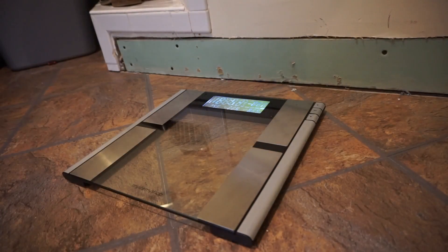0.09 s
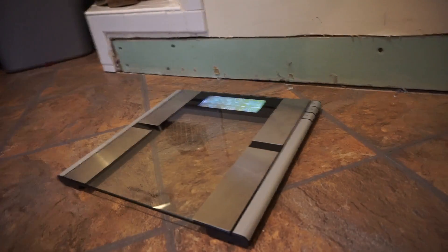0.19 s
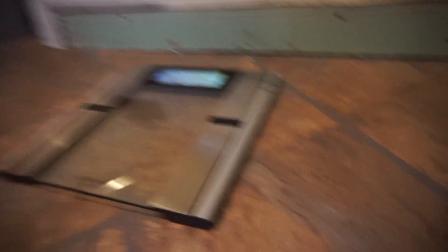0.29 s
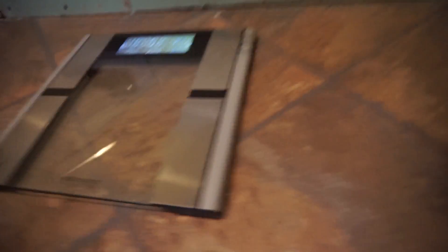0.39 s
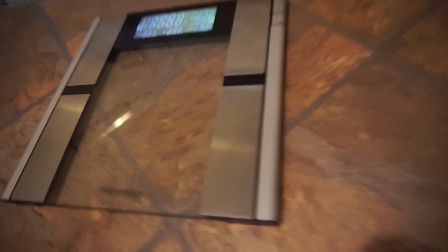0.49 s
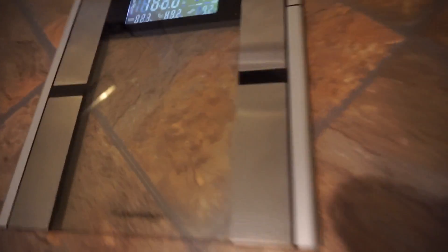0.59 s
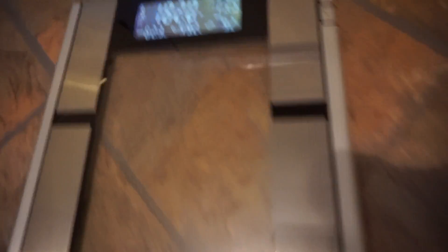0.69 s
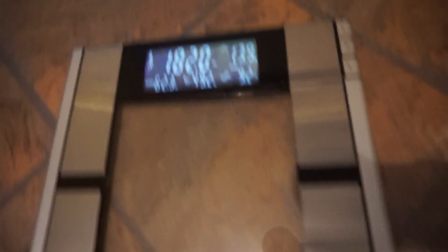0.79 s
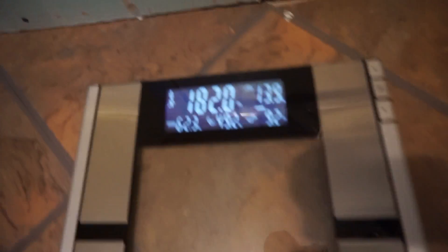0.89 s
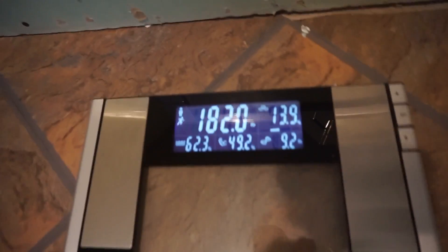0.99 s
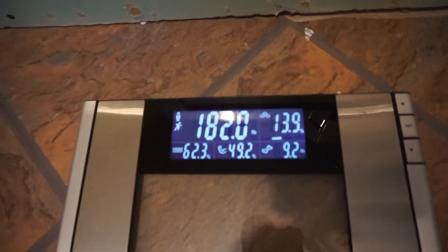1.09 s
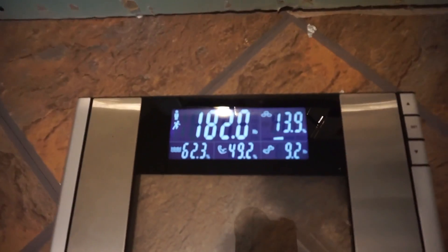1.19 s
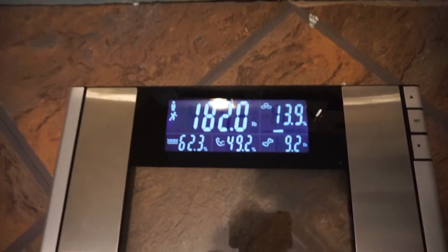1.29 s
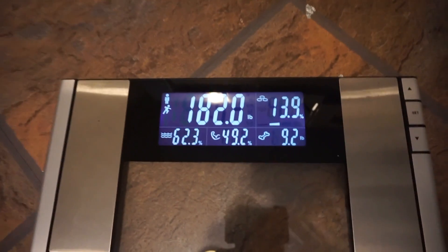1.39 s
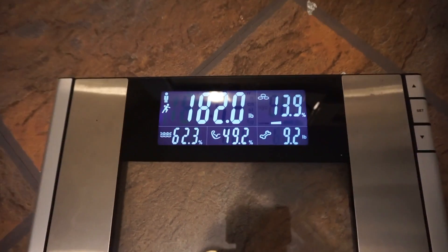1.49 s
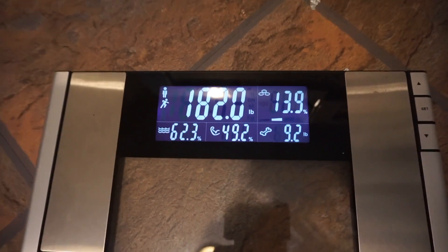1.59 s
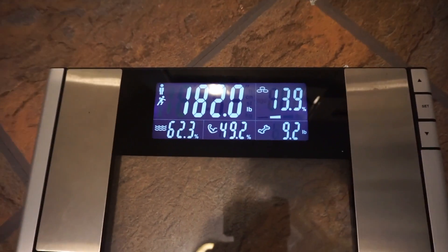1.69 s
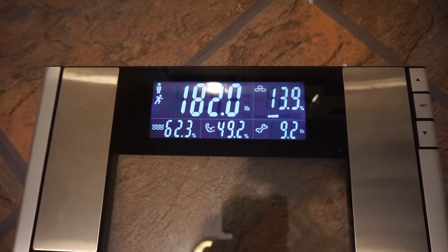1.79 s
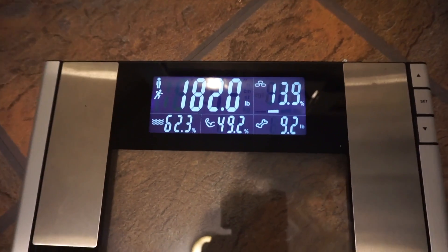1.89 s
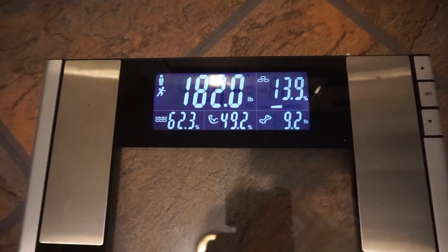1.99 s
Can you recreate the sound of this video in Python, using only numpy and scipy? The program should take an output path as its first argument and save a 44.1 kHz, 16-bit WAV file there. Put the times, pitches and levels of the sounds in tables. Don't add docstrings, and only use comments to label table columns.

```python
import sys
import numpy as np
from scipy import signal
from scipy.fft import rfft, irfft
from scipy.io import wavfile
from scipy.ndimage import uniform_filter1d

SR = 44100
rng = np.random.default_rng(int(sys.argv[2]) if len(sys.argv) > 2 else 0)


def amplitude_ratio(level_db):
    exponent = np.asarray(level_db, float) / 20
    return 10 ** exponent


def materialize(psi):
    bounded = np.clip(np.atleast_2d(psi).T, -1, 1)
    quanta = np.round(bounded * 32767).astype(np.int16)
    wavfile.write(sys.argv[1], SR, quanta)


N = 88200

# f/Hz, level/dB
HISS_TONE = [(20, -20), (60, -17.5), (200, -21.5), (650, -7), (1300, -6.5), (2330, -9.5), (14500, -15),
             (16500, -24)]
# f/Hz, likeness (1 = the same)
HISS_LIKENESS = [(60, 0.34), (240, 0.1), (950, 0.0102), (3770, 0.011), (15000, 0.38)]
# f/Hz, width/Hz, level/dB
HISS_PEAKS = [(1150, 100, 7), (1450, 33, 9.5), (3060, 590, 3)]
# t/s, length/s, level/dB, start f/Hz, end f/Hz
SQUEAKS = [
    (.42, .055, -51, 1720, 1680),
    (.515, .02, -53, 1200, 1210),
    (.547, .04, -53, 1110, 1290),
]
# t/s, level/dB
RUB_LEVELS = [
    (.2, -70.5),
    (0.229, -32.5),
    (0.262, -34),
    (.285, -71),
    (0.329, -43),
    (.4, -40),
    (0.449, -44),
    (.55, -52),
    (.7, -56.5),
]
# f/Hz, level/dB
RUB_TONE = [(30, -41), (130, 1), (300, -4), (900, -7.5), (1670, -2.5), (3000, 0.5), (8740, -11),
            (16000, -21)]
# f/Hz, likeness (negative = opposed)
TOUCH_LIKENESS = [(60, 1), (240, 1), (950, 0.61), (3770, -0.18), (15000, -0.22)]
# f/Hz, width/Hz, level/dB
RUB_PEAKS = [(350, 41, 9.5), (1250, 110, 12), (1740, 70, 7.5), (2590, 250, 2)]
# t/s, peak level/dB, centre f/Hz, fade/s, left minus right/dB
SNAPS = [(0.2125, -21, 4000, 0.0047, -6), (.229, -28, 6040, 0.037, -8), (0.248, -14, 7200, 0.005, -12),
         (.2528, -40, 6500, 0.0051, 8), (0.2674, -8, 7250, 0.0078, -1.5), (0.3132, -22, 6340, 0.007, -14),
         (0.3205, -5.5, 5400, 0.0071, 0.5), (0.3357, -17.5, 6430, 0.0064, -1),
         (0.3526, -40, 8600, 0.0078, -2), (0.3551, -22.5, 8700, 0.0089, 5), (0.361, -23.5, 6000, 0.005, -5),
         (.3885, -34, 8500, .008, 5), (0.393, -36, 6000, .008, 4), (0.4202, -33.5, 4930, 0.022, -.3),
         (0.47, -36, 8100, 0.0071, 5), (0.4954, -35.5, 6650, 0.0085, -3), (0.6695, -43, 5700, 0.014, -2),
         (0.7165, -35, 6850, 0.007, 0), (0.7883, -33, 5460, 0.012, -5.5), (.7895, -30, 3200, .009, 1),
         (0.3219, -22, 4500, 0.0096, -4), (0.728, -37, 3200, 0.019, -5)]
# f/Hz, width/Hz, level/dB
SEAM_PEAKS = [(4330, 320, 7.5), (6000, 760, 1.5), (7950, 370, 4.5), (10300, 310, 4), (11700, 700, 1.5)]
# t/s, low level/dB, middle level/dB, high level/dB, middle f/Hz
GRIP_KNOCKS = [(.2125, -60, -31.5, -29.5, 1570), (.2212, -56, -28.5, -47, 1150),
               (.2308, -23.5, -18, -26, 1230), (.2335, -18, -15.5, -14, 1830),
               (.2358, -22.5, -22.5, -14, 1360), (.2398, -15, -26, -23, 1120),
               (.2428, -19.5, -13, -32, 1440), (.2452, -18, -38, -48, 940), (.2498, -33, -30, -30, 1360),
               (.2525, -21, -21.5, -19, 1770), (.2565, -33, -23.5, -40, 1230),
               (.2595, -28, -25.5, -44, 1190), (.264, -20, -22.5, -37, 1340),
               (.2968, -45, -17.5, -34, 1297), (.3035, -27, -37, -37, 1250), (.3115, -30, -34, -39, 1900),
               (.3165, -46, -24.5, -28, 2100), (.3212, -30.5, -24.5, -19.5, 1280),
               (.3375, -34, -13.5, -19.5, 1216), (.3428, -19.5, -18.5, -47, 1195),
               (.3532, -15, -25, -27, 1150), (.3792, -37, -21.5, -38, 1870),
               (.3808, -27.5, -20, -25.5, 1360), (.3838, -15.5, -28, -44, 1220),
               (.3885, -26, -23, -36, 1406), (.3942, -18.5, -20.5, -48, 1480),
               (.3965, -23.5, -24, -30, 1340)]
SETTLING_TAPS = [(0.155, -57, -67, -51, 1100), (0.5397, -32.5, -36, -45, 820), (.479, -61, -68, -60, 910),
                 (0.5509, -43.5, -48, -59, 1150), (.605, -45, -39.5, -49, 930), (0.614, -49, -49, -60, 825),
                 (.67, -64, -44, -57, 1850), (0.7165, -20.5, -26.5, -29.5, 1150),
                 (0.7238, -28.5, -34, -50, 1060), (0.73, -46, -42, -52, 980), (0.734, -56, -62, -52, 990),
                 (.741, -48, -61, -58, 1190), (.7525, -65, -67, -62, 900), (.7885, -46, -32, -36, 1880),
                 (.7908, -60, -42, -42, 1880), (0.99, -58, -44.5, -50, 1450), (1.035, -54, -47, -56, 1290),
                 (1.046, -59, -54, -71, 1400), (1.062, -57.5, -47.5, -61, 1060),
                 (1.08, -61, -57, -62, 1410), (1.357, -67, -57, -67, 990), (1.373, -65, -45.5, -55, 1390),
                 (1.391, -71, -47.5, -61, 1340), (1.458, -82, -49, -51.5, 1480),
                 (1.49, -75, -52, -60, 1350), (1.545, -74, -50, -59, 1150), (1.56, -69, -52, -62, 1150),
                 (1.734, -71, -56, -65, 1250), (1.8632, -65, -42, -53, 1406)]
# left minus right/dB, left lead/rad
MIC_PATHS = [(0.5, 1), (-5, -0.23), (-2.5, -0.94), (0, -1.45)]
# f/Hz, level/dB
RATTLE_TONE = [(60, -6), (250, -8), (600, 0.5), (1400, 2.5), (3200, -4.5), (4500, -15.5), (9000, -31),
               (16000, -38.5)]


def evened(x):
    return x / np.sqrt(np.mean(x ** 2) + 1e-20)


def read(points, hz):
    f, value = np.transpose(points)
    return np.interp(np.log(hz + 1), np.log(f + 1), value)


def bumps(peaks, hz):
    return sum(db * np.exp(-((hz - f) / width) ** 2) for f, width, db in peaks)


def add(mix, start_s, sound):
    part = mix[:, round(start_s * SR):][:, :sound.shape[1]]
    part += sound[:, :part.shape[1]]


def noise(tone_db, likeness, patchy_db):
    frames, hz = N // 128 + 5, np.fft.rfftfreq(512, 1 / SR)
    a, b, c, d, patches = rng.standard_normal((frames, 257, 5)).T
    patches = uniform_filter1d(patches, size=6, axis=0)
    patches = evened(uniform_filter1d(patches, size=14, axis=1))
    like = np.clip(read(likeness, hz), -1, 1)[:, None]
    left = a + 1j * b
    right = like * left + np.sqrt(1 - like ** 2) * (c + 1j * d)
    spectra = np.array([left, right]) * amplitude_ratio(tone_db(hz)[:, None] + patchy_db * patches)
    return evened(signal.istft(spectra, nperseg=512, noverlap=384)[1][:, :N])


def hiss():
    def tone_db(hz):
        return read(HISS_TONE, hz) + bumps(HISS_PEAKS, hz)
    return amplitude_ratio(-54.5) * noise(tone_db, HISS_LIKENESS, patchy_db=.9)


def room(x):
    level_db, dull_hz, t60_s = -18, 4000, .6
    t = np.arange(SR // 2) / SR
    tail = rng.standard_normal((2, len(t))) * amplitude_ratio(-60 * t / t60_s) * (t > .004)
    tail = signal.lfilter(*signal.butter(1, dull_hz, fs=SR), tail)
    tail = tail / np.linalg.norm(tail[0])
    return amplitude_ratio(level_db) * signal.fftconvolve(x, tail, axes=1)[:, :N]


def squeaks():
    out = np.zeros((2, N))
    wobble = evened(uniform_filter1d(rng.standard_normal(N), size=200))
    for start_s, length_s, db, from_hz, to_hz in SQUEAKS:
        progress = np.arange(0, length_s, 1 / SR) / length_s
        waver = wobble[round(start_s * SR):][:len(progress)]
        hz = from_hz + (to_hz - from_hz) * np.sqrt(progress) + 28 * waver
        tone = np.sin(2 * np.pi * np.cumsum(hz) / SR)
        swell = np.sqrt(np.sin(np.pi * progress))
        add(out, start_s, np.ones((2, 1)) * swell * amplitude_ratio(db) * tone)
    return out


def rub():
    end_s, grit_db = .78, 2.5
    s, db = np.transpose(RUB_LEVELS)
    times = list(s) + [end_s, end_s + .05]
    levels = list(db) + [db[-1], -90]
    level_db = np.interp(np.arange(N) / SR, times, levels, left=-90)
    grit = evened(uniform_filter1d(rng.standard_normal(N), size=150))

    def tone_db(hz):
        return read(RUB_TONE, hz) + bumps(RUB_PEAKS, hz)
    return amplitude_ratio(level_db + grit_db * grit) * noise(tone_db, TOUCH_LIKENESS, patchy_db=5)


def snaps():
    rise_s, width, same = 0.00066, 0.27, -0.0055
    wide_db, full_db, slope = -6.5, -14, 0.9
    out, t = np.zeros((2, N)), np.arange(2048) / SR
    hz = np.fft.rfftfreq(2048, 1 / SR)
    side = np.array([[.5], [-.5]])
    for start_s, db, mid_hz, fade_s, pan_db in SNAPS:
        left, other = rng.standard_normal((2, 2048))
        burst = np.array([left, same * left + np.sqrt(1 - same ** 2) * other])
        peak = np.exp(-(np.log((hz + 1) / mid_hz) / width) ** 2)
        splash = amplitude_ratio(wide_db + slope * (db - full_db)) * hz ** 2 / (hz ** 2 + 500 ** 2)
        tone = (peak + splash) * amplitude_ratio(bumps(SEAM_PEAKS, hz))
        fall = amplitude_ratio(db - 4.5 - 60 * t / fade_s / 2 + pan_db * side)
        shape = np.minimum(t / rise_s, 1) * fall
        add(out, start_s, shape * evened(irfft(rfft(burst) * tone)))
    return out


def ring(hz, db, t60_s, path):
    t, side = np.arange(3000) / SR, np.array([[.5], [-.5]])
    pan_db, lead = path
    rise = (1 - np.exp(-t * hz * 4.63)) ** 2
    fall = amplitude_ratio(db + 4.5 + pan_db * side - 60 * t / t60_s)
    return rise * fall * np.sin(2 * np.pi * hz * t + lead * side)


def knocks():
    rattle_db, rattle_t60_s = -13, 0.041
    shell_low_hz = 190
    thud_path, low_path, mid_path, high_path = MIC_PATHS
    out, kick = np.zeros((2, N)), np.zeros((1, N))
    fade_db = -60 * np.arange(4000)[None] / SR / rattle_t60_s
    for start_s, low_db, mid_db, high_db, mid_hz in GRIP_KNOCKS + SETTLING_TAPS:
        u = rng.uniform(-1.11, 1, 3)
        thud = ring(290 * (1 + 0.27 * u[0]), low_db - 11.5, 0.032, thud_path)
        low = ring(597 * (1 + 0.19 * u[1]), low_db, 0.013, low_path)
        middle = ring(mid_hz, mid_db, 0.012, mid_path)
        high = ring(2928 * (1 + 0.04 * u[2]), high_db, 0.01, high_path)
        add(out, start_s, thud - low + middle + high)
        add(kick, start_s, amplitude_ratio(max(low_db, mid_db) + rattle_db + fade_db))
    out = signal.lfilter(*signal.butter(2, shell_low_hz, "high", fs=SR), out)
    buzz = noise(lambda hz: read(RATTLE_TONE, hz), TOUCH_LIKENESS, patchy_db=4)
    return out + signal.lfilter([.1], [1, -.9], kick) * buzz


def scene():
    duck_from_db, duck_share, hold_samples = -40, 0.25, 1500
    hits = knocks() + snaps()
    power = abs(uniform_filter1d((hits ** 2).mean(0), size=hold_samples))
    loud_db = 10 * np.log10(power + 1e-12)
    duck = amplitude_ratio(-duck_share * np.maximum(loud_db - duck_from_db, 0))
    return hits + duck * (room(hits) + hiss()) + rub() + squeaks()


def roll_off(x):
    return signal.sosfilt(signal.butter(12, 16790, fs=SR, output="sos"), x)


def record(dry):
    bass_hz, top_hz = 143, 16000
    thin = signal.lfilter(*signal.butter(2, bass_hz, "high", fs=SR), dry)
    limit = signal.firwin(255, top_hz, window=("kaiser", 9), fs=SR)
    return roll_off(signal.oaconvolve(thin, limit[None], "same"))


dry = scene()
out = record(dry)
materialize(out)
```